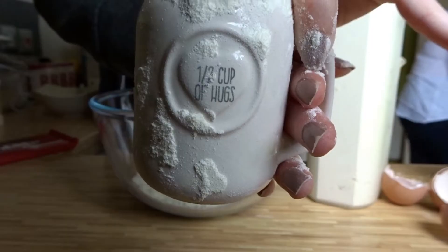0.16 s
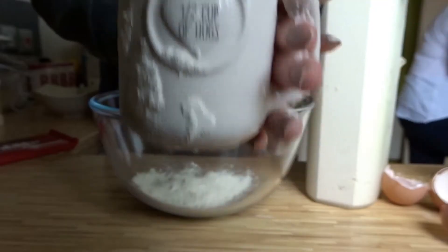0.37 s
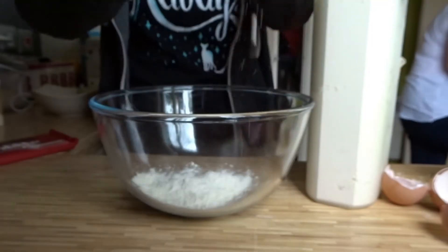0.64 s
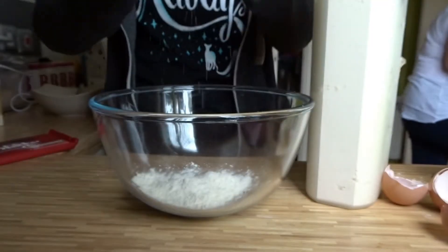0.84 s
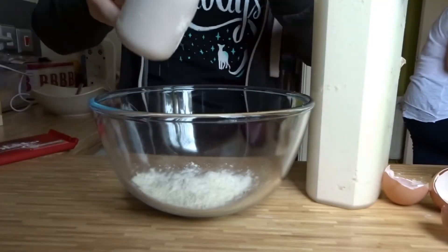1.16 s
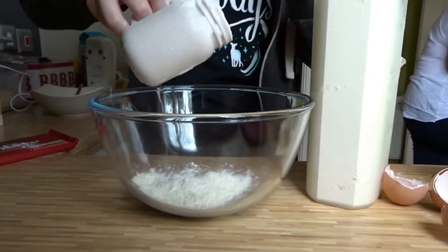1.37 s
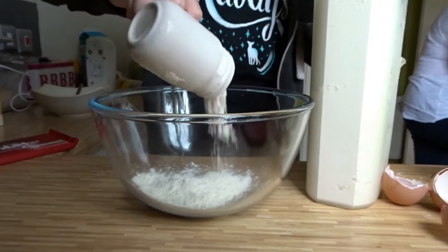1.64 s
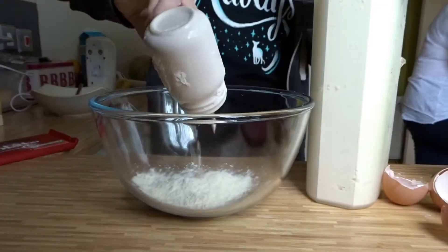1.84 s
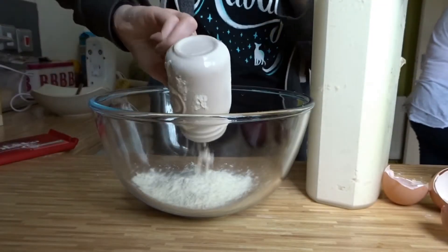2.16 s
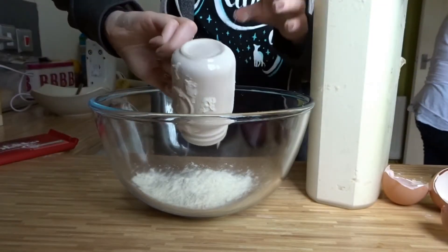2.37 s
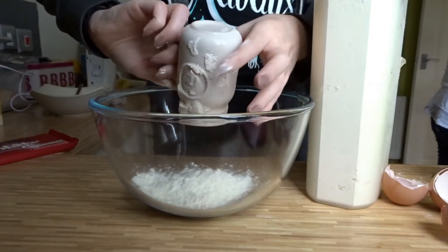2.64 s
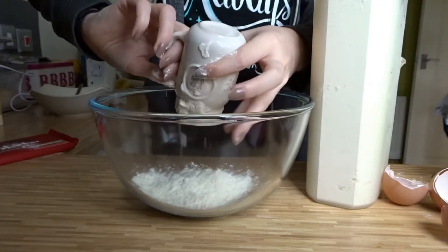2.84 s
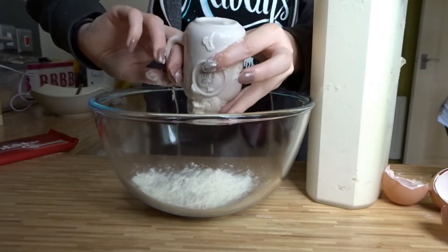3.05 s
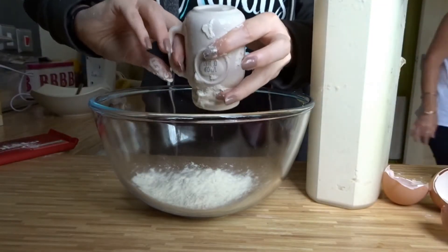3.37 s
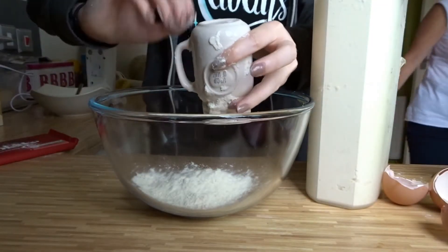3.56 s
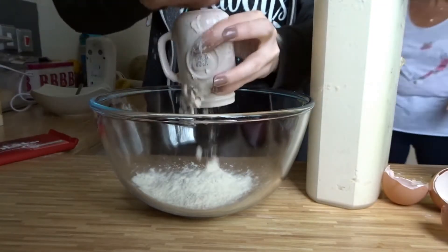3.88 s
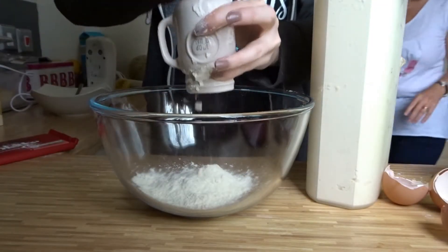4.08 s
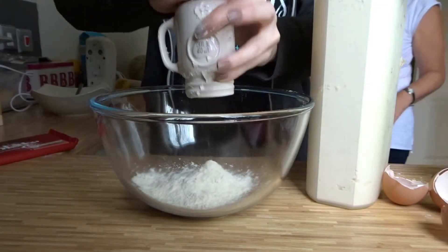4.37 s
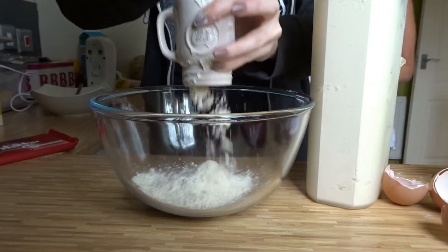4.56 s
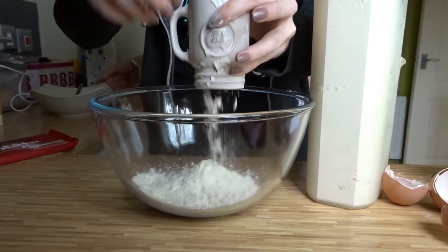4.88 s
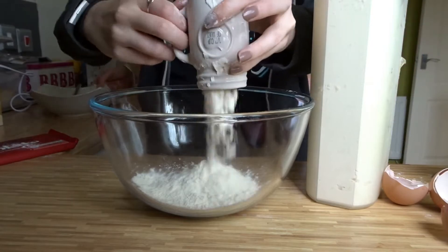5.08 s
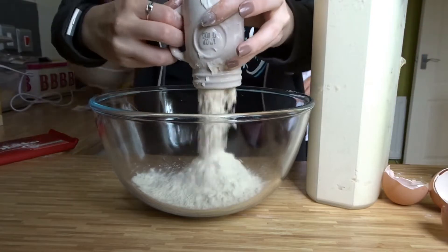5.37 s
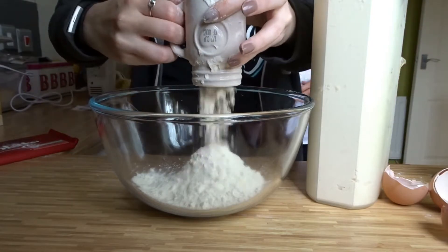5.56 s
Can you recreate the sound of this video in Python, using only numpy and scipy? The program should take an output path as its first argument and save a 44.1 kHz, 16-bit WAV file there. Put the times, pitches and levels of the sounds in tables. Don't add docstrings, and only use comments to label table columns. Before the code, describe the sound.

Over a soft appliance roar, drawers rattle and cutlery clinks across the kitchen, then four close pats on a cup shake flour loose.

```python
import sys
import numpy as np
from scipy import signal
from scipy.fft import rfft, irfft
from scipy.io import wavfile
from scipy.ndimage import uniform_filter1d

SR = 44100
rng = np.random.default_rng(int(sys.argv[2]) if len(sys.argv) > 2 else 0)


def put_to_file(sound):
    columns = np.atleast_2d(sound).T
    safe = np.clip(columns, -1, 1)
    whole_steps = np.round(safe * 32767)
    wavfile.write(sys.argv[1], SR, whole_steps.astype(np.int16))


def convert_level_to_amplitude(level_db):
    exponent = np.asarray(level_db, float) / 20
    return 10 ** exponent


N = 252516
T = np.arange(N) / SR
HZ = np.fft.rfftfreq(N, 1 / SR)

# [t/s, peak level/dB, f/Hz, nail level/dB]
FINGERS = [(3.7888, -15, 5400, -28), (3.7907, -8.5, 5600, -15.5), (3.7913, -9.5, 3900, -26),
           (4.0510, -31, 6000, -38), (4.0532, -18, 2800, -36), (4.0543, -6.5, 2800, -22),
           (4.2957, -24, 4000, -38), (4.2980, -14.5, 2800, -24), (4.2993, -6, 2900, -17.5),
           (4.5414, -12, 5800, -28), (4.5424, -10, 2600, -36), (4.5444, -9, 2000, -18.5)]
FINGER_CYCLES = (2.8, 3.5, 1.1)
# [delay/s, level/dB, f/Hz, cycles]
CUP_WALL = (.0008, -11, 2100, 1.5)
# [f/Hz, level/dB, cycles]
GLAZE = [(5100, 4, 1.9), (6900, 3.5, 4.1), (9100, 1, 2.9), (10500, -3.5, 5.5), (14000, -17, 8.2)]
# [t/s, level/dB, f/Hz, t60/s]
BOOMS = [
    (3.79, -33, 316, 0.047),
    (3.791, -30.5, 610, 0.022),
    (4.0535, -25, 501, 0.058),
    (4.2993, -22.5, 516, 0.041),
    (4.5438, -19.5, 500, 0.055),
]
# [delay/s, level over the boom/dB, f/Hz, cycles]
PALM_REBOUNDS = [(.0026, 5, 2000, 2.2), (.0065, 1, 1200, 0.95), (.009, 3, 1800, 2)]
# [t/s, level/dB, swell/s, hold/s]
SLIDES = [
    (3.622, -58, 0.11, .005),
    (3.792, -49.5, .012, 0.076),
    (4.16, -42.5, .25, 0.053),
    (4.288, -49, .02, .04),
    (4.563, -44.5, .03, 0.023),
    (4.604, -43, .15, .015),
]
# [f/Hz, level per Hz/dB]
FLOUR_COLOUR = [(880, -29), (1500, -17), (3270, -4.5), (4820, -9), (6070, -9.5), (13100, -20), (15500, -24),
                (16300, -38)]
# [t/s, level/dB, f/Hz, gap between pieces/s]
CLUMPS = [
    (4.108, -33.5, 1740, .009),
    (4.318, -34.5, 1000, .010),
    (4.582, -41, 1900, 0.016),
]
# [level/dB, pitch ratio]
CLUMP_PIECES = [(-1.5, 1), (0, 0.93), (-3, 1.64), (-7, 0.97)]
# [t/s, level/dB, f/Hz, width/Hz]
KNOCKS = [(.896, -25, 2550, 900), (1.05, -34, 6400, 300), (1.13, -36, 310, 60), (1.148, -49, 154, 40),
          (1.205, -40.5, 5100, 400), (1.229, -33, 1360, 82.5), (1.731, -47.5, 60, 40), (2.85, -55, 60, 40),
          (3.668, -61, 5500, 2500), (3.796, -38, 4060, 300), (3.79, -43, 14000, 1500),
          (3.7955, -43, 14400, 1200), (1.17, -34, 721, 30), (1.24, -41, 268, 14), (2.97, -40.5, 440, 40),
          (2.853, -27, 1270, 150), (4.973, -39.5, 910, 300), (4.978, -47.5, 373, 198),
          (5.28, -47, 4300, 800)]
# [start t/s, end t/s]
RATTLE_SPANS = [
    (.88, 1.4),
    (1.715, 2.12),
    (2.84, 3.16),
]
# [t/s, force level/dB, swell/s, hold/s, looseness/dB]
JOLTS = [
    [(.898, -16, 0.016, .03, -30), (.972, -22.5, .04, .095, -4), (1.1, -30, .05, .05, -12),
     (1.157, -31.5, .03, .03, -4), (1.24, -40.5, 0.056, 0.12, -16)],
    [(1.733, -20.5, 0.02, 0.0092, -1.5), (1.765, -25, 0.068, 0.022, 6)],
    [(2.854, -26, 0.022, 0.0044, -8), (2.868, -28.5, 0.052, .022, -9), (2.93, -38, 0.043, .04, -4)],
]
# [fade/dB per s, panel level/dB, thud level/dB, panel/dB per dB of looseness]
BUILDS = [
    (300, -4, -18, .4),
    (146, -9, -6, 1.1),
    (160, 4, -4, -0.25),
]
# [f/Hz, level per Hz/dB]
RATTLE_COLOURS = [
    [(24, -83), (40, -63.5), (194, -17.5), (262, -12.5), (585, -11), (715, 3), (770, -11), (831, -5),
     (1410, -6.5), (2100, -2.5), (6330, -12), (16000, -41)],
    [(24, -71), (40, -52), (185, -19), (312, -9.5), (529, -6.5), (770, -2), (942, -12), (1150, -6),
     (1480, -9.5), (2840, -11), (14100, -61), (16000, -66)],
    [(24, -75), (40, -56), (204, -42), (297, -19), (372, -19.5), (444, -12), (942, -9.5), (1240, -4),
     (1480, -6.5), (6020, -23), (14100, -43), (16000, -58)],
]
# [f/Hz, level/dB, t60/s]
BODIES = [
    [(268, -17, .9), (720, -14, .28), (855, -15, .2), (1320, -18, .2), (2131, -16, .12), (2401, -14, .12),
     (2805, -15, .1), (6450, -21, .1)],
    [(265, -9, .15), (311, -20, 1.1), (786, -15, .12), (1184, -11, .18), (1913, -11, .15), (2765, -11, .15),
     (2814, -11, .15), (3395, -13, .15)],
    [(300, -16, .15), (416, -12, .25), (491, -9, .25), (817, -13, .15), (1061, -10, .2), (1248, -5, .2),
     (1750, -10, .2), (2401, -13, .12), (2750, -13, .04), (3050, -15, .03)],
]
BAND_EDGES = (500, 1500, 4500)
# [t/s, ring level/dB, ring f/Hz, overtone level/dB, tick level/dB]
CLINKS = [
    (2.389, -34.5, 5000, -59, -50.5),
    (2.467, -35.5, 6460, -34, -47),
    (2.576, -46, 7640, -53, -46.5),
    (2.733, -50, 7700, -60, -52.5),
]
# [f/Hz, level per Hz/dB]
TICK_COLOUR = [(1760, -22), (3000, -14), (3430, -6), (5920, -10), (7690, -4), (8990, -8.5), (15200, -4.5),
               (16300, -12)]
# [t/s, level/dB]
ROAR_LEVEL = [(0, -36.5), (.45, -36), (.88, -36), (1.3, -38), (1.75, -38.5), (2.1, -42.5), (2.4, -41.5),
              (3.7, -42), (4.6, -41.3), (5.73, -41.8)]
# [f/Hz, level per Hz/dB]
ROAR_EARLY = [(18, -76), (30, -46), (59, -54), (90, -21), (221, -15.5), (252, -8.5), (336, -10),
              (415, -3.5), (1130, 7.5), (1350, 1.5), (2010, 3.5), (5310, -14.5), (6550, -18),
              (15500, -37.5), (16000, -61)]
# [f/Hz, level per Hz/dB]
ROAR_LATE = [(18, -75), (30, -45), (64, -61), (90, -32), (221, -47), (295, 2.5), (336, -19.5), (499, -5),
             (584, -25), (666, -9), (1100, -7.5), (1390, -13.5), (2120, -9), (4420, -14.5), (16000, -31)]
# [f/Hz, width/Hz, level/dB]
DUCT = [(1000, 150, -2), (2120, 160, -3), (3340, 560, -8), (6400, 1100, -17.5)]
# [f/Hz, level/dB]
HUM = [(100, -31), (150, -32.5), (200, -26.5), (250, -23), (300, -23)]
# [f/Hz, t60/s]
KITCHEN = [(150, 0.11), (500, 0.49), (2000, 0.37), (6000, 0.34), (15000, 0.25)]
# [f/Hz, likeness 0-1]
PORT_LIKENESS = [(60, 1), (150, 0.98), (380, 1), (950, 0.85), (2380, 0.72), (5980, 0.0084), (15000, 0.047)]

LEAD_S = 40 / SR


def pats():
    out = np.zeros(N)
    nail = sum(convert_level_to_amplitude(db) * click(hz, cycles) * (-1) ** k for k, (hz, db, cycles) in enumerate(GLAZE))
    delay, wall_db, wall_hz, wall_cycles = CUP_WALL
    for (s, db, hz, nail_db), cycles in zip(FINGERS, np.resize(FINGER_CYCLES, len(FINGERS))):
        add(out, s - LEAD_S, convert_level_to_amplitude(db) * click(hz, cycles) + convert_level_to_amplitude(nail_db) * nail)
        add(out, s + delay - LEAD_S, convert_level_to_amplitude(db + wall_db) * click(wall_hz, wall_cycles))
    for s, db, hz, t60 in BOOMS:
        add(out, s, convert_level_to_amplitude(db) * ring(hz, t60))
        for lag, over_db, palm_hz, cycles in PALM_REBOUNDS:
            add(out, s + lag, convert_level_to_amplitude(db + over_db) * click(palm_hz, cycles))
    return signal.sosfilt(signal.butter(2, 170, "high", fs=SR, output="sos"), out)


def click(hz, cycles):
    t = T[:600] - LEAD_S
    attack = np.exp(-(t * hz / .55) ** 2)
    decay = np.exp(-t * hz / (.6 * cycles))
    shape = np.where(t < 0, attack, decay)
    wave = shape * np.cos(2 * np.pi * hz * t)
    return wave - shape * wave.sum() / shape.sum()


def ring(hz, t60):
    t = T[:SR // 4]
    mode = np.sin(2 * np.pi * hz * t) * convert_level_to_amplitude(-60 * t / t60)
    return signal.sosfilt(signal.butter(2, hz / 3.2, "high", fs=SR, output="sos"), mode)


def flour():
    fade = 113
    hiss = coloured(rng.standard_normal((2, N)), FLOUR_COLOUR)
    slow = T[::32]
    power = sum(swell(slow, *slide, fade) ** 2 for slide in SLIDES)
    return hiss * convert_level_to_amplitude(3.5) * np.interp(T, slow, np.sqrt(power))


def swell(t, s, db, rise, hold, fade):
    climb_db = 40 * np.clip((s - t) / rise, 0, 5)
    fall_db = fade * np.clip(t - s - hold, 0, None)
    return convert_level_to_amplitude(db - climb_db - fall_db)


def knocks():
    out = np.zeros(N)
    pieces = []
    for s, db, hz, gap in CLUMPS:
        for k, (piece_db, ratio) in enumerate(CLUMP_PIECES):
            pieces.append((s + k * gap, db + piece_db, hz * ratio, hz * ratio))
    for s, db, hz, width in KNOCKS + pieces:
        blow = ring(hz, 4.8 / width)
        add(out, s, convert_level_to_amplitude(db + 29.0) * blow / np.linalg.norm(blow))
    return out


def rattle(span, jolts, build, colour, body):
    fade, panel_db, thud_db, follow = build
    t = np.arange(*span, 1 / SR)
    chance, size, sign = rng.random((len(t), 2, 3)).T
    struck = chance < 9000 / SR
    clicks = struck * convert_level_to_amplitude(-1.3 * np.log(size)) * np.sign(sign - .5)

    spectrum = rfft(coloured(clicks, colour))
    hz = np.fft.rfftfreq(len(t), 1 / SR)
    below = [0, *(1 / (1 + (hz / edge) ** 4) for edge in BAND_EDGES), 1]
    bands = [evened(irfft(spectrum * (up - low), len(t))) for low, up in zip(below, below[1:])]

    power = np.array([swell(t, s, db, rise, hold, fade) ** 2 for s, db, rise, hold, _ in jolts])
    power *= signal.windows.tukey(len(t), .03) ** 2
    loose_db = np.transpose(jolts)[4]
    level = 0 * loose_db
    shares = (thud_db + level, panel_db + follow * loose_db, level, loose_db)
    chatter = np.zeros((2, len(t) + SR // 2))
    chatter[:, :len(t)] = sum(band * np.sqrt(convert_level_to_amplitude(2 * db) @ power) for band, db in zip(bands, shares))

    rings = sum(convert_level_to_amplitude(db) * resonate(chatter, f, 2.2 / t60) for f, db, t60 in body)
    rings *= np.sqrt(np.mean(power.sum(0)))
    return span[0], convert_level_to_amplitude(-1.5) * chatter + convert_level_to_amplitude(-5) * rings


def clinks():
    out = np.zeros(N)
    for s, db, hz, over_db, tick_db in CLINKS:
        tick = coloured(rng.standard_normal(1024), TICK_COLOUR) * convert_level_to_amplitude(-60 * T[:1024] / 0.077)
        main = convert_level_to_amplitude(db + 15.5) * ring(hz, .018)
        overtone = convert_level_to_amplitude(over_db + 10.5) * ring(1.81 * hz, 0.024)
        add(out, s, main + overtone)
        add(out, s, convert_level_to_amplitude(tick_db + 18.5) * tick)
    return out


def roar():
    full_db, dull_per_db = -36.4, .118
    s, level_db = np.transpose(ROAR_LEVEL)
    early = np.minimum(1 + dull_per_db * (level_db - full_db), 1)
    hz, t, z = signal.stft(rng.standard_normal((2, N)), SR, nperseg=1024, noverlap=768)
    patches = rng.standard_normal(z.shape[1:])
    patches = evened(uniform_filter1d(uniform_filter1d(patches, 10, 0), 12, 1))

    share = np.interp(t, s, np.clip(early, 0, 1))
    shape_db = np.outer(read(ROAR_EARLY, hz), share) + np.outer(read(ROAR_LATE, hz), 1 - share)
    peaks = sum(convert_level_to_amplitude(2 * db) / (1 + (2 * (hz - f) / w) ** 2) ** 2 for f, w, db in DUCT)
    power = convert_level_to_amplitude(2 * shape_db - 1.0) + peaks[:, None]
    z = z * np.sqrt(power / power.mean(0)) * convert_level_to_amplitude(patches)
    air = signal.istft(z, SR, nperseg=1024, noverlap=768)[1][:, :N]
    ripple_db = 2.38 * evened(uniform_filter1d(rng.standard_normal(len(HZ)), size=80))
    air = irfft(rfft(air) * convert_level_to_amplitude(ripple_db), N)

    hum = sum(convert_level_to_amplitude(db) * np.sin(2 * np.pi * (f * T + rng.random())) for f, db in HUM)
    hum_fall = convert_level_to_amplitude(14.8 * np.interp(T, s, early - 1))
    air[0] += hum * hum_fall * np.sqrt(2)
    return air * convert_level_to_amplitude(np.interp(T, s, level_db))


def room(x, size):
    taps = np.zeros((2, SR // 2))
    at = np.arange(0, SR // 2 - 12, 12) + rng.integers(0, 12, (2, (SR // 2 - 1) // 12))
    np.put_along_axis(taps, at, rng.choice([-1., 1.], at.shape), 1)
    hz, t, z = signal.stft(taps, SR, nperseg=256)
    t60 = size * read(KITCHEN, hz)
    tail = signal.istft(z * convert_level_to_amplitude(-60 * t / t60[:, None]), SR, nperseg=256)[1]
    return signal.fftconvolve(x[None], tail / np.linalg.norm(tail[0]), axes=1)[:, :N]


def ports(pair):
    lean = np.arccos(np.clip(read(PORT_LIKENESS, HZ), -1, 1)) / 2
    a, b = rfft(pair)
    common, apart = np.cos(lean) * a, np.sin(lean) * b
    return irfft([common + apart, common - apart], N)


def evened(x):
    return x / np.sqrt(np.mean(x ** 2) + 1e-20)


def read(points, hz):
    f, value = np.transpose(points)
    return np.interp(np.log(hz + 1), np.log(f + 1), value)


def add(mix, s, sound):
    part = mix[..., round(s * SR):][..., :sound.shape[-1]]
    part += sound[..., :part.shape[-1]]


def coloured(x, points):
    n = x.shape[-1]
    return evened(irfft(rfft(x) * convert_level_to_amplitude(read(points, np.fft.rfftfreq(n, 1 / SR))), n))


def resonate(x, hz, width):
    r = np.exp(-np.pi * width / SR)
    return evened(signal.lfilter([1, 0, -1], [1, -2 * r * np.cos(2 * np.pi * hz / SR), r * r], x))


def scene():
    far = np.zeros((2, N))
    for parts in zip(RATTLE_SPANS, JOLTS, BUILDS, RATTLE_COLOURS, BODIES):
        add(far, *rattle(*parts))
    near, blows = pats(), knocks()
    bowl = convert_level_to_amplitude(-4.5) * room(uniform_filter1d(near, 8) + blows, size=.1)
    echoes = room(clinks() + blows + convert_level_to_amplitude(-12) * near + convert_level_to_amplitude(-13) * far[0], size=.9)
    skew = 0.19 * signal.hilbert(np.diff(near, prepend=0)).imag
    return ports(roar() + far + bowl + echoes + flour()) + near + np.outer([1, -1], skew)


def band_limit(x):
    return signal.sosfilt(signal.butter(12, 16480, fs=SR, output="sos"), x)


def record(dry):
    limited = signal.oaconvolve(dry, signal.firwin(127, 16250, fs=SR)[None], "same")
    return band_limit(limited)


dry = scene()
out = record(dry)
put_to_file(out)
```